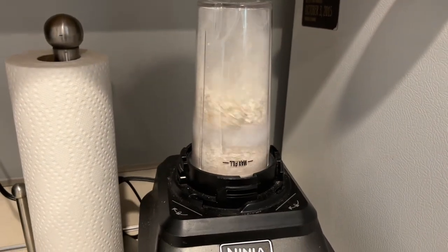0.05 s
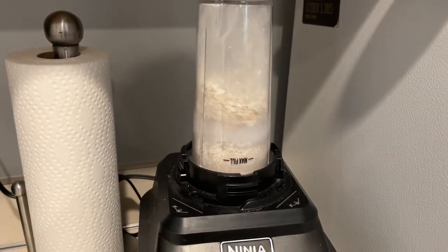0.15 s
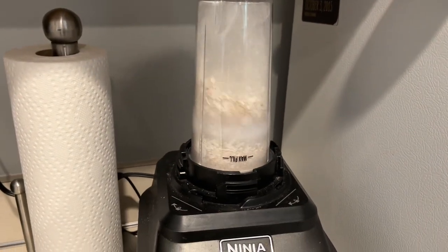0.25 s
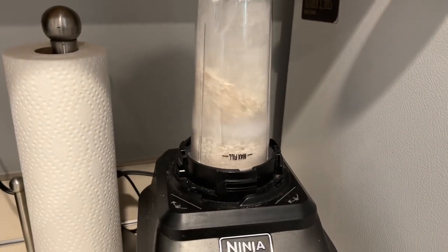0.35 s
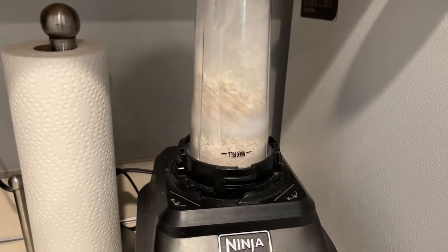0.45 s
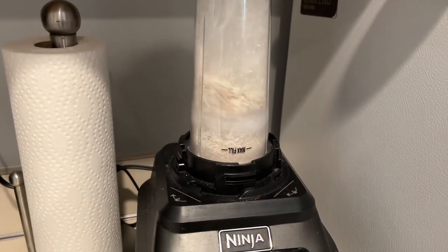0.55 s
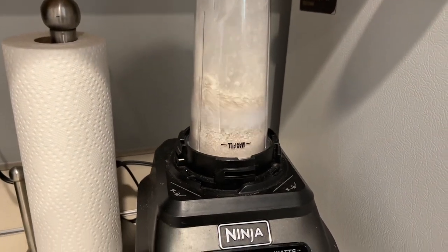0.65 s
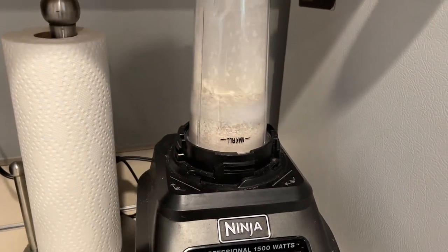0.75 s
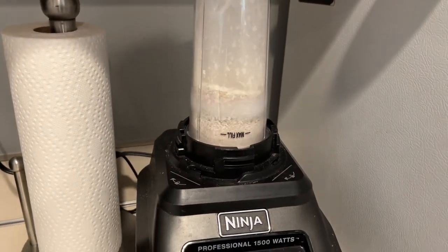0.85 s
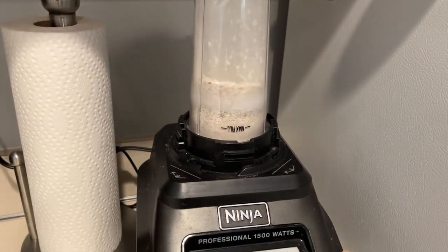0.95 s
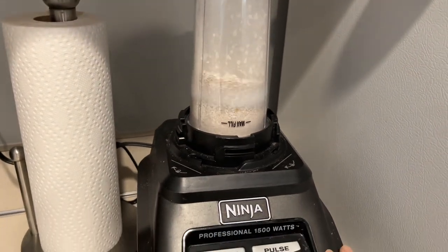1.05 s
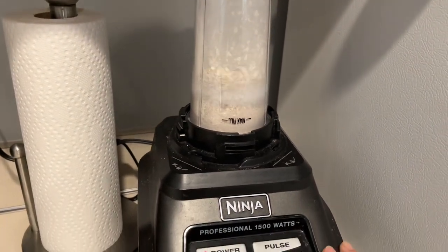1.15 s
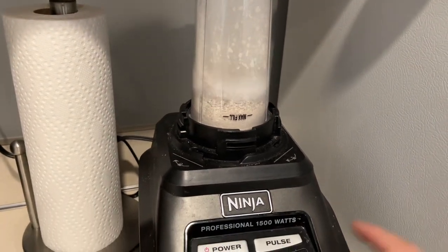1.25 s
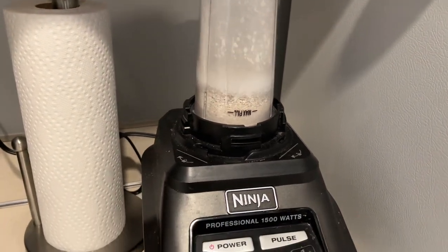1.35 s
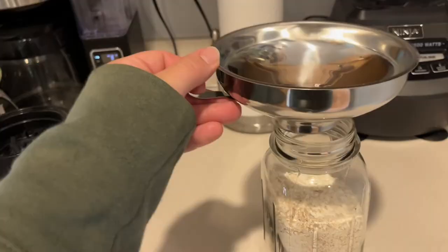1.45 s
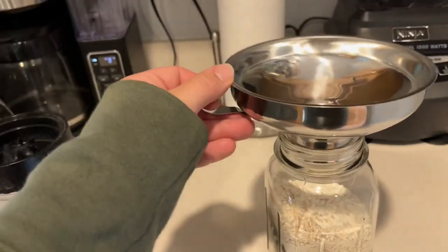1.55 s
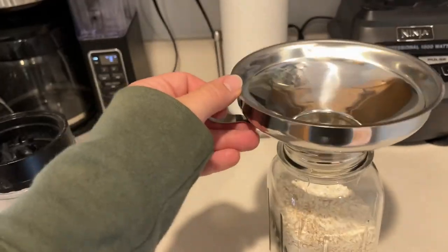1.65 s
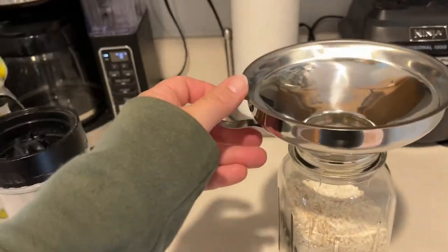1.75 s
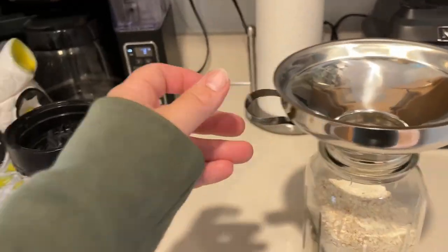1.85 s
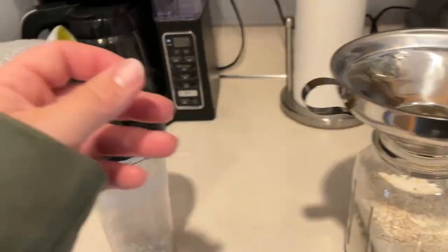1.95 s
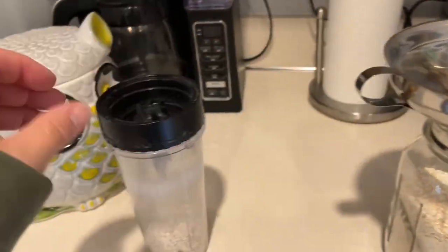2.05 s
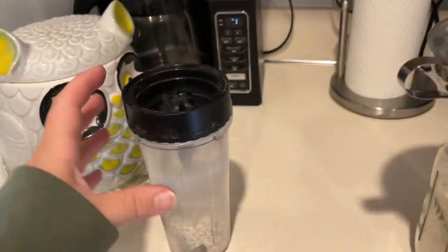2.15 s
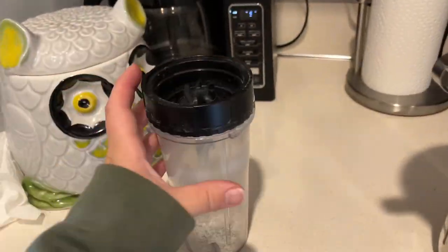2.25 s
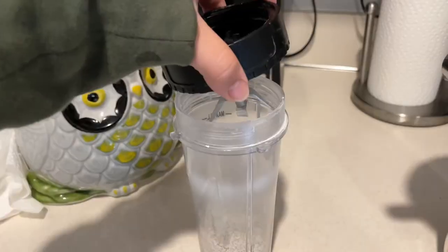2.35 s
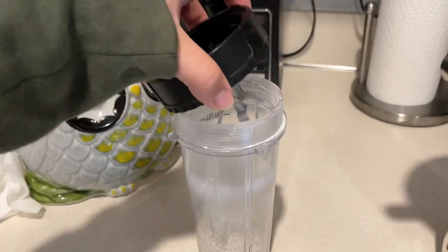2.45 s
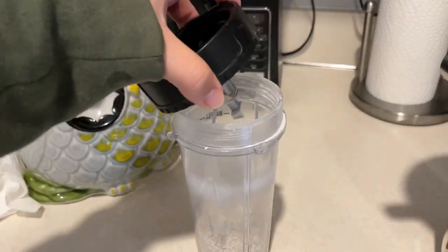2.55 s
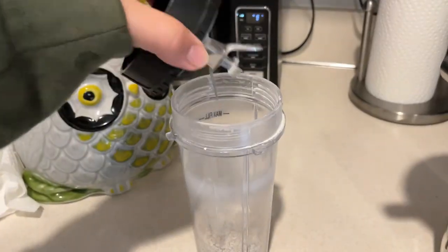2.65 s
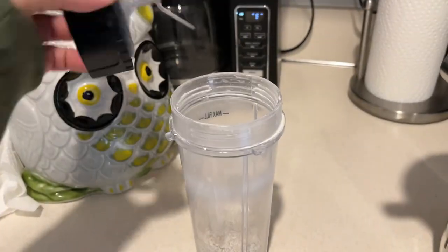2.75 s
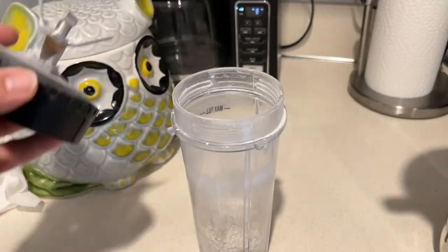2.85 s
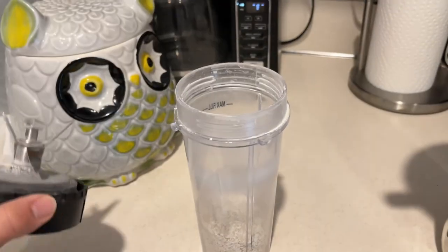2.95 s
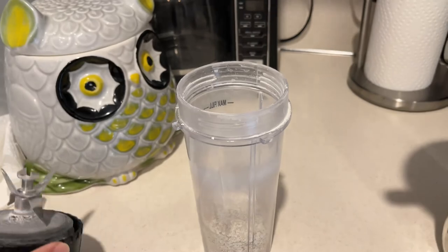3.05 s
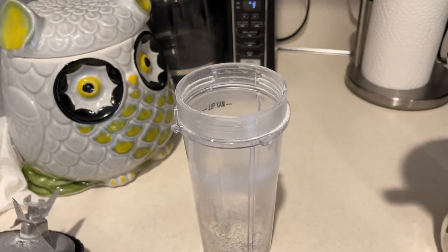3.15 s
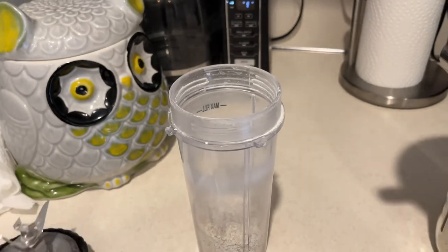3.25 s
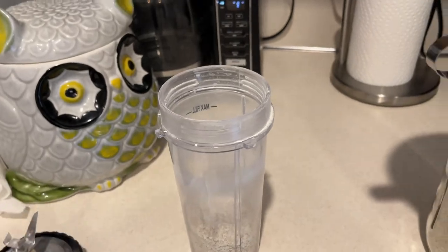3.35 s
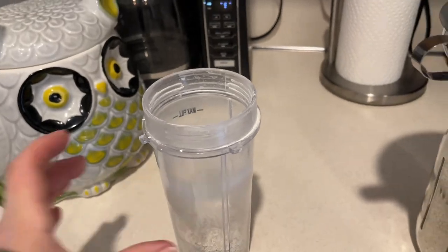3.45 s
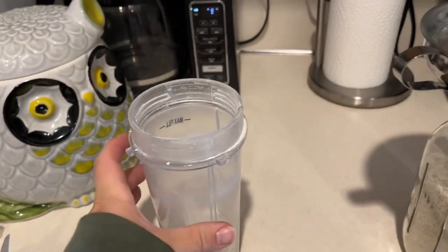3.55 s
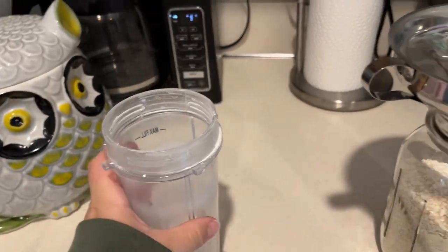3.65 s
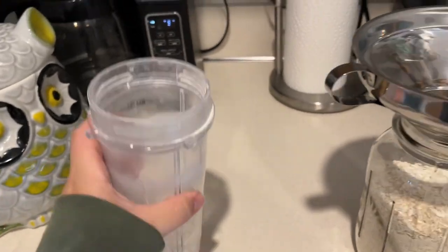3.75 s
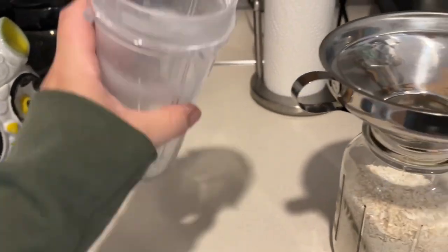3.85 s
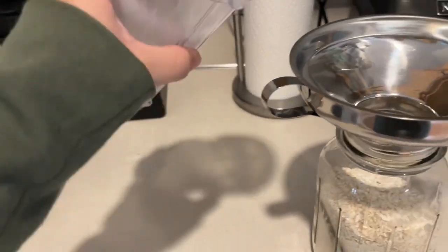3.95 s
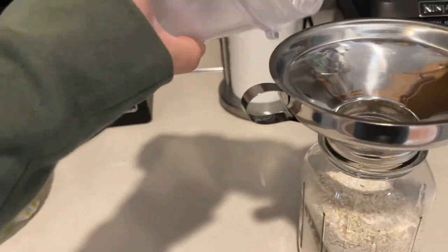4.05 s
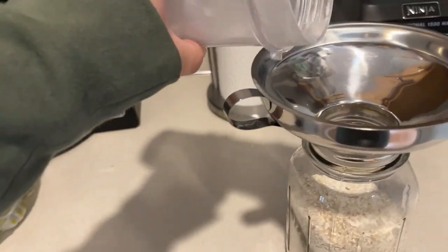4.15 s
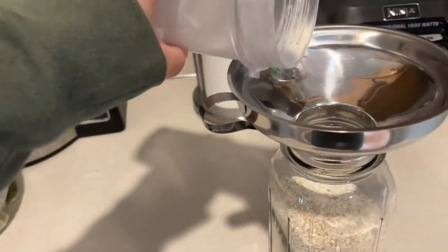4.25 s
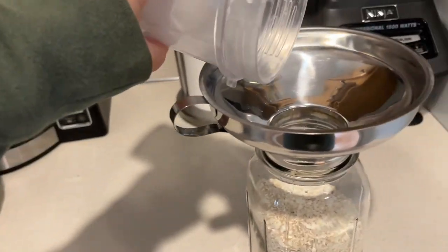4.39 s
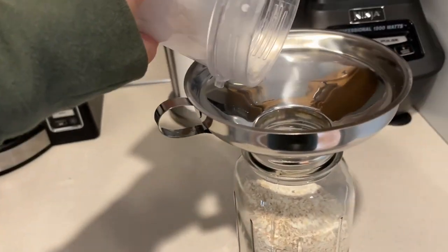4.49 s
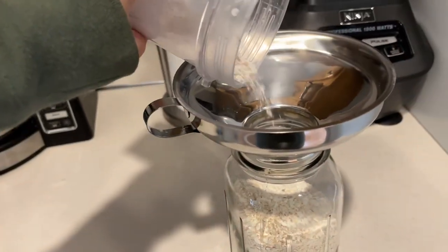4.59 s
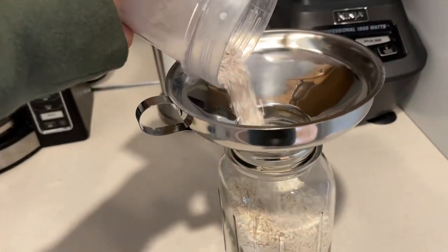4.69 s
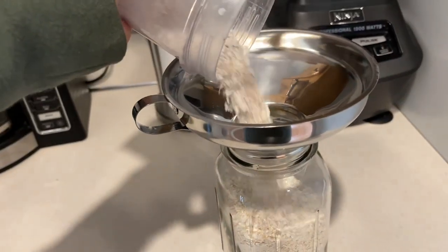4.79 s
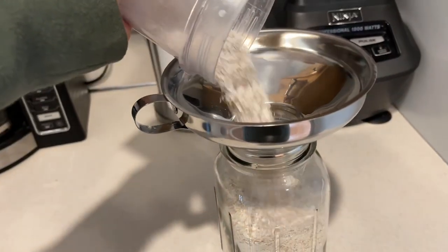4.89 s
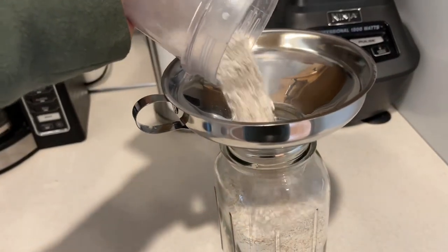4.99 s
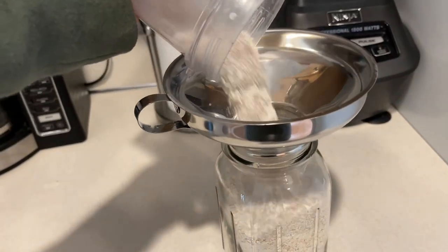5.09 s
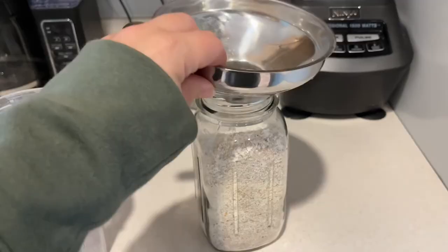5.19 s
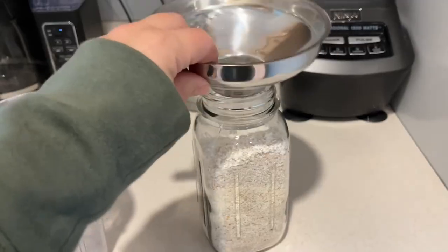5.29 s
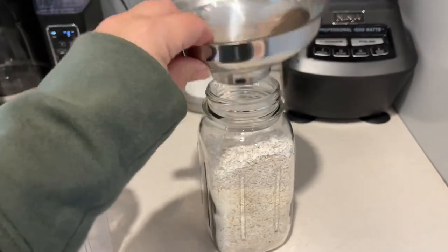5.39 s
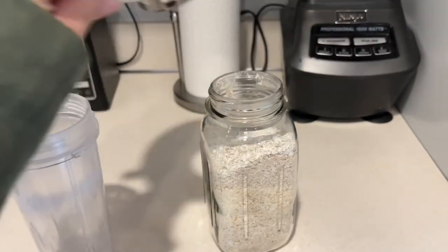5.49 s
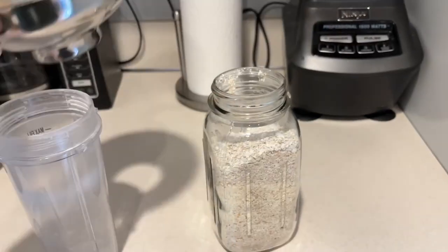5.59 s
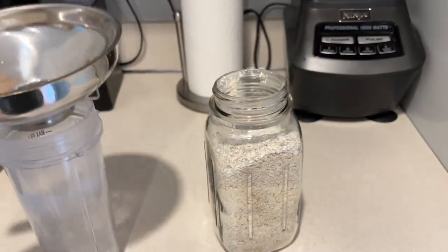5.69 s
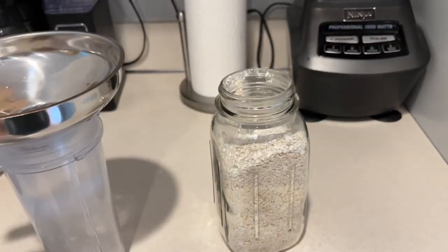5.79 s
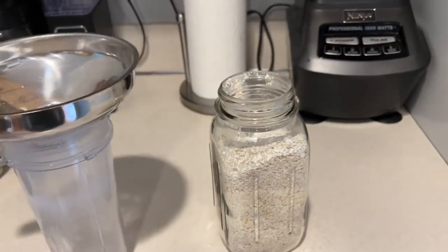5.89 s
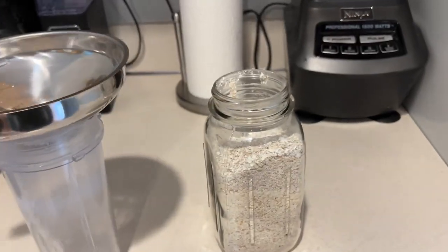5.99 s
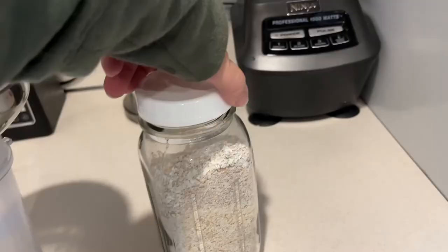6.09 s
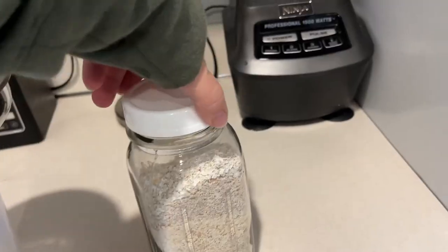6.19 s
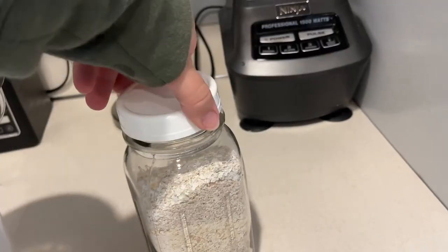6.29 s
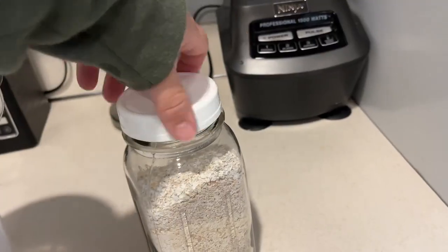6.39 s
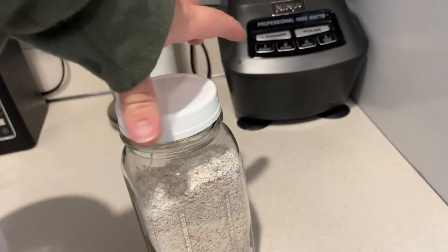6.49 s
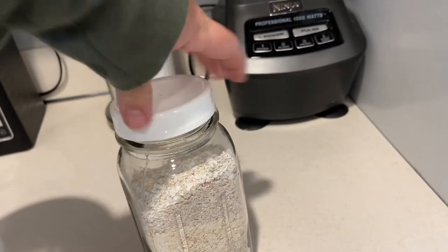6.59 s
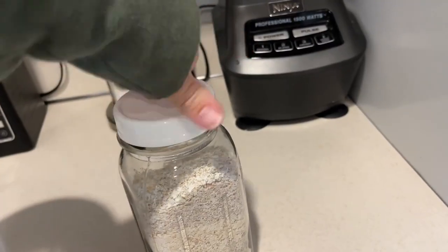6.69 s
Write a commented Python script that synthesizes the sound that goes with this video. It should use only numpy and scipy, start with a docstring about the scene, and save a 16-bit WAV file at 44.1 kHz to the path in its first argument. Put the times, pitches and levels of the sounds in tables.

```python
"""Eggshell powder in a kitchen

A blender grinds eggshells, with whining tones and pelting grit that both follow the shaft speed as it coasts
to a stop. In a humming kitchen a steel funnel is set on a glass jar, the blade base comes off the plastic cup
and is put down, the powder is poured, the funnel is dropped on the cup and a plastic lid is screwed on the jar.
Knocks are short noise bursts plus ringing tones; powder, rubbing and scraping are streams of tiny impacts.
"""
import sys
import numpy as np
from scipy import signal
from scipy.fft import rfft, irfft, next_fast_len
from scipy.io import wavfile
from scipy.ndimage import uniform_filter1d

SR = 44100
rng = np.random.default_rng(int(sys.argv[2]) if len(sys.argv) > 2 else 0)


def unload_wav(signal):
    """Save mono or channel-first audio to the path in sys.argv[1] as 16-bit WAV at rate SR, clipped to [-1, 1]."""
    wavfile.write(
        sys.argv[1],
        SR,
        np.round(np.clip(np.atleast_2d(signal).T, -1, 1) * 32767).astype(np.int16),
    )


N = 296793
TIME = np.arange(N) / SR

# Tones of the blender's whine.
# Each row: multiple of the shaft speed, level in dB before the housing, change while coasting in dB.
WHINE_TONES = [(1.995, 2, -0.5), (3.997, -9, 1), (5.98, -3.5, -11), (7.19, -11.5, 6), (8.05, -9.5, 3.5),
               (9.97, -8.5, -5.5), (11.96, -8.5, -3), (13.74, -20.5, -3), (16.04, -18.5, -4),
               (18.4, -17, -9), (27.5, -28, 15)]
# How strongly the motor housing passes each pitch. Each row: frequency in Hz, gain in dB.
HOUSING_RESPONSE = [(40, -18), (110, -3), (250, -7), (420, -1.5), (650, -2), (830, 2), (1150, 3),
                    (1480, 6.5), (1950, -7.5), (2650, -10), (3050, -28), (3240, 1), (3450, -1), (3880, 4.5),
                    (4300, 2), (6000, -4.5), (9000, -19.5)]

# Colours: how the strength of a sound is spread from bass to treble.
# Each row of these: frequency in Hz, relative level in dB per Hz.
# First the grit in the blender and the kitchen air.
GRIT_COLOUR = [(30, -5), (100, -4), (150, -6.5), (370, 3), (550, -2), (950, 5.5), (1200, 4), (1500, 11.5),
               (1800, 5), (2800, -2), (4100, 4.5), (5500, -2), (6700, 0.5), (9200, -7.5), (10200, -4),
               (12700, -6), (14000, -11), (16000, -13)]
KITCHEN_COLOUR = [(25, 1), (40, -9), (72, -9), (100, 4.5), (140, -9), (220, -4.5), (330, -6.5), (500, 0.5),
                  (900, -2.5), (1550, -5), (2000, -10.5), (2700, -19.5), (4700, -22.5), (6000, -28),
                  (16000, -31)]
# Knocks of funnel, cup, blade base and lid, before their own thud and crack are added. Same columns.
FUNNEL_KNOCK_COLOUR = [(80, -8), (120, -7), (170, -4), (330, -1.5), (600, -4.5), (850, 3), (1200, -4),
                       (1600, -16), (2100, -16.5), (2900, -5.5), (3700, -24.5), (5200, -16.5),
                       (7000, -24.5), (12000, -30), (16000, -33)]
CUP_KNOCK_COLOUR = [(80, -8), (110, 7), (170, 3), (256, -14), (400, -5.5), (700, -4.5), (1050, 6),
                    (1400, -3.5), (1800, -9), (2400, -17.5), (3300, -27), (5000, -29.5), (7500, -35),
                    (12000, -48), (16000, -64)]
BASE_KNOCK_COLOUR = [(41, -45), (70, -9), (268, -4.5), (385, -11.5), (579, -9.5), (815, -1.5), (977, 0),
                     (1120, -1.5), (1650, -7), (1930, -2), (3260, -20), (6590, -25), (9700, -32.5),
                     (10900, -46), (16000, -60)]
LID_KNOCK_COLOUR = [(60, -40), (110, -15), (240, -1.5), (550, 0.5), (1000, -2.5), (1500, 4.5), (2150, -1),
                    (2850, -25), (4100, -14.5), (5300, -23), (8000, -19.5), (11500, -28), (16000, -36)]
# Rubbing of the cup, sliding powder, and powder pattering into the jar. Same columns.
CUP_RUB_COLOUR = [(300, -2), (700, -2), (1000, 20), (1600, 5), (2700, -21), (3700, 6.5), (4300, -7),
                  (4800, 12), (5600, -16), (6700, -2.5), (9500, -23), (16000, -36)]
POWDER_COLOUR = [(500, -41), (2500, -11), (4500, -5), (8000, -6.5), (12500, -5.5), (16000, -15)]
JAR_PATTER_COLOUR = [(150, -27), (350, -8.5), (700, -7.5), (1100, 2), (1500, -9.5), (2500, -27),
                     (8000, -40)]
# The lid's edge scraping, and the lid's thread. Same columns.
LID_SCRAPE_COLOUR = [(500, 2), (1100, 4.5), (2000, -3), (2900, -15), (4100, 3), (5600, -13.5), (9000, -20),
                     (11700, -18), (13000, -26), (16000, -32)]
THREAD_COLOUR = [(150, -8), (550, 2.5), (1100, 3), (1500, 1), (2100, 6), (2800, -15.5), (4000, -8.5),
                 (5300, -19), (7000, -17), (9500, -25), (11500, -22), (16000, -39)]

# Steady tones of the appliance hum. Each row: frequency in Hz, level in dB.
HUM_TONES = [(54.6, -62.5), (93, -71), (99, -72.5), (118, -72.5), (287.8, -59.5), (602, -69.5),
             (699, -76.5), (803, -67.5), (926, -66.5), (1029, -75.5), (1204, -76.5)]

# Ringing tones (modes) of each object.
# Each row of these: frequency in Hz, level in dB, time to fade by 60 dB in seconds.
# The steel funnel by itself, ringing free.
FUNNEL_MODES = [(4113, 1, .52), (4103, -5, .5), (5416, -11, .16), (6149, -6, .66), (6616, -13, .2),
                (6880, -16, .2), (7337, -10, .12), (8350, -16, .48), (10502, -10, .32), (11776, -17, .26),
                (12330, -21, .24), (12920, -18, .2), (13235, -11, .2)]
# The glass jar together with the steel funnel. Same columns.
JAR_MODES = [(129, -2, 0.072), (315, -3.5, 0.095), (472.7, 1, 0.087), (576.6, 0.5, 0.13), (638, -5, 0.18),
             (807.6, 7, 0.076), (926, 2, 0.14), (1590, -9, 0.1), (1878, -3.5, .14), (2470, -8, 0.12),
             (2700, -7.5, 0.096), (3505, -44, 0.038)]
# The plastic cup, the blade base and the lid. Same columns.
CUP_MODES = [(249.4, 9, 0.075), (700, 15, 0.039), (763, -4, 0.16), (870, 5.5, .17), (1030, -8.5, 0.22),
             (1112, -0.5, 0.27), (1186, -33, .13), (1421, -11, 0.42), (1616, 2.5, 0.043),
             (2360, -6.5, 0.098)]
BASE_MODES = [(269.5, -3, 0.17), (880, 4, 0.15), (1154, 11, 0.083), (1230, 2.5, 0.1), (1547, -4.5, 0.22),
              (1910, -1, 0.12), (1990, -6, 0.12), (2290, -11, .11), (3680, -20, 0.13), (4280, -10, 0.074),
              (4940, -18, .1), (5286, -17, .1)]
LID_MODES = [(1360, -19, .08), (1760, -5, 0.074), (2120, 7, 0.11), (2610, -8, 0.064)]

# The funnel knocks on the jar.
# Each row: start in seconds, level in dB, thud in dB, crack in dB, steel ring in dB.
FUNNEL_BLOWS = [(1.5668, -21.5, -11, -7, -39), (1.596, -27.5, -6, -7, -46), (1.617, -37.5, -6, -1, -53),
                (1.635, -39.5, -6, -7, -47), (1.6653, -17.5, 6.5, 1, -26), (1.749, -34, -8, 8, -54),
                (5.235, -16.5, -2, 11.5, -35), (5.247, -22, -11, 3, -22.5), (5.288, -16, 7.5, 8, -26),
                (5.334, -21, -2, -15, -43), (5.339, -20.5, -3.5, -15.5, -63), (5.393, -27.5, -14, -11, -46)]
# Steel skids over the glass rim. Each row: start in seconds, level in dB.
FUNNEL_SKIDS = [(1.677, -28), (1.69, -26.5), (5.267, -31.5), (5.316, -34.5)]
# Knocks on the cup: the blade base comes off, later the funnel lands.
# Each row: start in seconds, level in dB, thud in dB, crack in dB.
CUP_BLOWS = [(2.321, -32, 2.5, 1.5), (2.465, -40, -3, 6), (2.503, -31.5, 7.5, 7.5),
             (2.528, -27.5, -12, -10), (2.56, -24, -2.5, 4), (2.614, -31, -4, -3), (3.71, -50.5, 2, 17),
             (5.7808, -19.5, -13, 2.5), (5.811, -31, -6, 8)]
# The blade base is set on the counter. Each row: start in seconds, level in dB, thud in dB, crack in dB.
BASE_BLOWS = [(3.23, -20, -0.5, 1), (3.245, -27, 2, 7), (3.255, -29.5, 1, -13), (3.305, -42, 0, -18),
              (3.362, -27.5, -3, 14.5)]
# The lid clicks on the jar. Each row: start in seconds, level in dB, thud in dB, crack in dB.
LID_BLOWS = [(6.352, -40, 7, 6.5), (6.4875, -37.5, 10, -2), (6.616, -37, 17, 2), (6.6335, -24.5, -30, -3),
             (6.671, -40, 18, 10)]

# Sliding movements. Each row of these: time of the peak in seconds, peak level in dB,
# rise in seconds, fall in seconds. First the hand rubbing the cup.
CUP_STROKES = [(1.87, -60, .2, 0.2), (2.3, -68, .14, .04), (2.68, -63.5, 0.31, .18),
               (3.69, -62, 0.16, 0.15), (3.86, -53.5, 0.077, .14)]
# Powder slides down the tilting cup. Same columns.
POWDER_SLIPS = [(3.96, -70, .05, .14), (4.1, -61.5, 0.018, .05), (4.932, -65, .02, 0.017)]
# The bulk of the powder lands in the jar. Same columns.
POWDER_HEAP = [(4.92, -51.5, 0.17, 0.11)]
# The lid's edge scrapes the glass. Same columns.
LID_SCRAPES = [(6.085, -46.5, 0.039, 0.062), (6.472, -46, 0.034, 0.044), (6.67, -50.5, 0.044, .12)]
# Turns of the lid on its thread. Same columns.
LID_TURNS = [(6.17, -50.5, .07, .18), (6.46, -48, 0.071, 0.074), (6.645, -44, .02, 0.16)]

# The level dips briefly. Each row: middle in seconds, length at full depth in seconds, depth in dB.
DIPS = [(2.359, 0.02, -31), (5.222, 0.0061, -8), (6.121, 0.0072, -32)]

RUN_HZ, POWER_OFF_S = 324.7, .515  # shaft speed under power; the moment it is switched off
START_LAG_HZ, SPIN_UP_S = 7, .08  # the last of the spin-up
DRAG_S, FRICTION_HZ_PER_S = .8, 201.5  # air drag and dry friction brake the coasting shaft
WHINE_DB, WHINE_POWER = -41.9, 0.44  # gain at full speed; amplitude goes as speed to this power
WHINE_KNEE_HZ, KNEE_WIDTH_HZ, WHINE_DROP_DB = 209, 12.6, -17.5  # below this speed the whine falls away
# grit: level at the start, at full speed; it is quieter as it slows and as it gets finer
GRIT_DB, GRIT_POWER, FINER_DB_PER_S = -48.5, 1.39, -4
KITCHEN_UP_S = 1.507  # the kitchen background comes up to full level here
HELD_FREEDOM, LIFTED_S = 0.28, 5.356  # share of its ring time the steel keeps on the jar; when it comes clear
SKID_RING_DB, SKID_TILT_DB, SKID_FREEDOM = -10, 8, 0.42  # ring of a skid, rise per octave, share of ring time
POUR_S, POUR_DB = 4.916, -63.5
POUR_RISE_S, POUR_HOLD_S, POUR_STOP_S = 0.51, 0.3, 0.12  # the stream builds as the cup tilts
ROCK_S, ROCK_GAP_S, ROCK_SHRINK = 5.873, .075, .7  # first tap, first gap, ratio from gap to gap
ROCK_DB, ROCK_LOSS_DB = -36.5, -4.8  # level of the first tap; change from tap to tap
KNOCK_LOW_HZ = 85  # the knocks are cut below this
ROOM_T60_S, ROOM_DB = 0.18, -10  # time for the tail to fade by 60 dB; its level
TOP_HZ = 16100

# Filters a third of an octave wide, for building knocks
BAND_HZ = 100 * 2 ** (np.arange(23) / 3)
BANDS = [signal.butter(2, [hz * .89, hz * 1.12], "band", fs=SR, output="sos") for hz in BAND_HZ]


def undb(db):
    """Turn decibels into a gain."""
    return 10 ** (np.asarray(db) / 20)


def unit(x):
    """Scale to an average (rms) level of 1."""
    return x / np.sqrt(np.mean(x ** 2))


def gain_at(hz, colour):
    """Read a colour's gain at the given frequencies."""
    points, db = np.transpose(colour)
    return undb(np.interp(np.log(hz + 1e-9), np.log(points), db))


def tint(x, colour):
    """Give a signal a colour, at rms 1."""
    size = next_fast_len(N)
    hz = np.arange(size // 2 + 1) * SR / size
    return unit(irfft(rfft(x, size) * gain_at(hz, colour), size)[:N])


def walk(rate):
    """Slow chance: random levels, `rate` of them a second, joined by slopes, spread 1."""
    hold = int(SR / rate)
    steps = np.repeat(rng.standard_normal(N // hold + 1), hold)
    return unit(uniform_filter1d(steps, hold)[:N])


def grains(per_s, spread_db=1):
    """Tiny impacts at random moments, a few larger than the rest."""
    size = undb(spread_db * np.minimum(rng.exponential(size=N), 2 * np.pi))
    hits = rng.random(N) < per_s / SR
    return hits * size * rng.standard_normal(N)


def swell(s, rise_s, fall_s, hold_s=0):
    """A rounded attack up to time s, a hold, an even decay; rise and fall each span 20 dB."""
    attack = (np.maximum(s - TIME, 0) / rise_s) ** 2
    release = np.maximum(TIME - s - hold_s, 0) / fall_s
    return undb(-20 * (attack + release))


def strokes(rows):
    """Gain of a series of sliding movements, each swelling and dying away."""
    return sum(undb(db) * swell(s, rise_s, fall_s) for s, db, rise_s, fall_s in rows)


def contact(colour, thud_db, crack_db, t60, bass_lag=0.039, thud_hz=450, crack_hz=3800):
    """The dense, fast-dying modes of a knock; lows last longer. Level 1 over five milliseconds."""
    t = np.arange(SR // 5) / SR
    thud = thud_db / (1 + (BAND_HZ / thud_hz) ** 2)
    crack = crack_db / (1 + (crack_hz / BAND_HZ) ** np.e)
    # a wider band holds more power
    gains = gain_at(BAND_HZ, colour) * undb(thud + crack) * np.sqrt(BAND_HZ)
    out = 0
    for hz, band, gain in zip(BAND_HZ, BANDS, gains):
        band_t60 = t60 * (1000 / hz) ** bass_lag
        fade = np.exp(-np.log(1000) * t / band_t60) * (1 - np.exp(-t / 0.00076))
        out = out + gain * unit(signal.sosfilt(band, fade * rng.standard_normal(len(t))))
    return out / np.sqrt(np.sum(out ** 2) / (SR / 200))


def ring(modes, freedom=1, scatter_db=2.5):
    """The clear modes of an object, weighted anew by every blow; touching it shortens them."""
    t = np.arange(SR * 2 // 3) / SR
    hz, db, t60 = np.transpose(modes)[:, :, None]
    size = undb(db + scatter_db * rng.standard_normal(hz.shape))
    fade = np.exp(-np.log(1000) * t / (t60 * freedom))
    waves = np.sin(2 * np.pi * (hz * t + rng.random(hz.shape))) * fade
    return np.sum(size * waves, axis=0) * (1 - np.exp(-t / 0.0018))


def add(out, s, sound):
    """Mix a sound in at time s."""
    start = int(s * SR)
    out[start:start + len(sound)] += sound[:N - start]


def struck(blows, colour, modes, t60, ring_db, chatter=0):
    """Each blow is a knock and a ring in proportion; with chatter, more crack than thud lasts longer."""
    out = np.zeros(N)
    for s, db, thud_db, crack_db, *_ in blows:
        knock_t60 = t60 * undb(chatter * (crack_db - thud_db))
        add(out, s, undb(db) * contact(colour, thud_db, crack_db, knock_t60))
        add(out, s, undb(db + ring_db) * ring(modes))
    return out


def shaft_speed():
    """The shaft settles at its running speed; with the power off, drag and friction bring it to rest."""
    driven = RUN_HZ - START_LAG_HZ * np.exp(-TIME / SPIN_UP_S)
    friction_hz = FRICTION_HZ_PER_S * DRAG_S
    coast_s = np.maximum(TIME - POWER_OFF_S, 0)
    braked = (driven + friction_hz) * np.exp(-coast_s / DRAG_S) - friction_hz
    return np.maximum(braked, 1)  # kept just above zero, as it is divided by later


def blender(flutter_db=1.3, coast_flutter_db=3.0, creep_hz=26):
    """Blades and fan whine on multiples of the shaft speed, grit pelts the cup; both fade with the speed."""
    steady = shaft_speed()
    share = steady / RUN_HZ
    coasting = np.clip(5 * (1 - share), 0, 1)  # reaches 1 when a fifth of the speed is gone
    # once the power is off, the dragging powder makes the shaft run unevenly
    speed = steady * (1 + (0.0013 + .006 * coasting) * walk(60.03))
    turn = 2 * np.pi * np.cumsum(speed) / SR

    whine = 0
    for k, db, coast_db in WHINE_TONES:
        flutter = (flutter_db + coast_flutter_db * coasting) * walk(34.75)
        # each tone swells as it slides through a resonance of the housing
        size = undb(db + coast_db * coasting + flutter) * gain_at(k * speed, HOUSING_RESPONSE)
        # a slow shaft no longer excites the high multiples
        size = size * np.exp(-k * (creep_hz / steady) ** 2)
        whine = whine + size * np.sin(k * turn + 0.075 * walk(120) + 2 * np.pi * rng.random())
    slow = 1 / (1 + np.exp((steady - WHINE_KNEE_HZ) / KNEE_WIDTH_HZ))
    whine_gain = undb(WHINE_DB + WHINE_DROP_DB * slow) * share ** WHINE_POWER

    # grit is flung in a puff at each blade pass, twice a turn
    puffs = 1 + 0.083 * np.sin(2 * turn)
    grit = grains(per_s=9000) * puffs * undb(0.46 * walk(25))
    finer_db = FINER_DB_PER_S * np.minimum(TIME, POWER_OFF_S)
    grit_gain = undb(GRIT_DB + finer_db) * share ** GRIT_POWER
    return whine * whine_gain + tint(grit, GRIT_COLOUR) * grit_gain


def kitchen(air_db=-57, early_db=-34):
    """Fan rush and the wavering hum of an appliance, far fainter while the blender is heard."""
    air = tint(rng.standard_normal(N), KITCHEN_COLOUR) * undb(air_db + 1.13 * walk(6.03))
    hum = 0
    for hz, db in HUM_TONES:
        size = np.sqrt(2) * undb(db + 1.57 * walk(6.3))
        hum = hum + size * np.sin(2 * np.pi * hz * TIME + np.sqrt(hz / 1200) * walk(9))
    kitchen_level_db = np.interp(TIME, [KITCHEN_UP_S - .03, KITCHEN_UP_S + 0.0044], [early_db, 0])
    return (air + hum) * undb(kitchen_level_db)


def funnel_on_jar():
    """Jar knocks and rim skids; the steel sings briefly while touching the glass, long once lifted clear."""
    out = struck(FUNNEL_BLOWS, FUNNEL_KNOCK_COLOUR, JAR_MODES, t60=.025, ring_db=-12.5, chatter=0.4)
    for s, *_, steel_db in FUNNEL_BLOWS:
        freedom = 1 if s > LIFTED_S else HELD_FREEDOM
        add(out, s, undb(steel_db) * ring(FUNNEL_MODES, freedom))
    # a skid bows the steel, which favours its higher modes
    lowest_hz = FUNNEL_MODES[0][0]
    bowed = [(hz, db + SKID_TILT_DB * np.log2(hz / lowest_hz), t60) for hz, db, t60 in FUNNEL_MODES]
    for s, db in FUNNEL_SKIDS:
        add(out, s, undb(db) * contact(FUNNEL_KNOCK_COLOUR, thud_db=-11, crack_db=22, t60=.1))
        add(out, s, undb(db + SKID_RING_DB) * ring(bowed, SKID_FREEDOM))
    return out


def cup_rubbing():
    """The hand rubs the cup: a dense stream of tiny impacts that swells with each stroke."""
    rub = tint(grains(per_s=4700), CUP_RUB_COLOUR)
    return rub * strokes(CUP_STROKES) * undb(1.5 * walk(29.93))


def knocks_on_cup(blows):
    """Blows make the plastic cup knock and ring for a short time."""
    return struck(blows, CUP_KNOCK_COLOUR, CUP_MODES, t60=0.022, ring_db=-14.5, chatter=0.41)


def base_on_counter():
    """The blade base knocks on the counter and its own modes ring."""
    return struck(BASE_BLOWS, BASE_KNOCK_COLOUR, BASE_MODES, t60=0.021, ring_db=-15)


def powder(patter_db=-2):
    """Powder slides down the cup and trickles over steel; its grains patter into the jar."""
    flow = undb(POUR_DB) * swell(POUR_S, POUR_RISE_S, POUR_STOP_S, POUR_HOLD_S)
    slide = tint(grains(per_s=5300, spread_db=1.5), POWDER_COLOUR)
    slide = slide * (flow + strokes(POWDER_SLIPS)) * undb(1.0 * walk(18))
    landing_gain = np.hypot(undb(patter_db) * flow, strokes(POWDER_HEAP))
    landing = tint(grains(per_s=1700), JAR_PATTER_COLOUR) * landing_gain
    return slide + landing


def rocking(count=5, thud_db=-1, crack_db=-6):
    """List the taps of the funnel settling on the cup, ever quicker and weaker."""
    taps = []
    s, gap_s = ROCK_S, ROCK_GAP_S
    for k in range(count):
        taps.append((s, ROCK_DB + ROCK_LOSS_DB * k, thud_db, crack_db))
        s, gap_s = s + gap_s, gap_s * ROCK_SHRINK
    return taps


def lid_scraping():
    """The lid's edge scrapes the glass in short strokes of tiny impacts."""
    return tint(grains(per_s=4500, spread_db=2.0), LID_SCRAPE_COLOUR) * strokes(LID_SCRAPES)


def lid_thread():
    """The thread sticks and slips as the lid turns, so its scrape comes in short bursts."""
    return tint(grains(per_s=1800), THREAD_COLOUR) * strokes(LID_TURNS) * undb(3.0 * walk(80))


def lid_clicks():
    """The plastic lid clicks on the jar and its modes ring briefly."""
    return struck(LID_BLOWS, LID_KNOCK_COLOUR, LID_MODES, t60=.019, ring_db=-18)


def room(x, damp_hz=7000):
    """Counter, wall and cupboards return a short, slightly duller tail."""
    t = np.arange(SR // 2) / SR
    onset = np.clip(t / 0.0024 - 1, 0, 1)
    tail = rng.standard_normal(len(t)) * np.exp(-np.log(1000) * t / ROOM_T60_S) * onset
    tail = tail / np.sqrt(np.sum(tail ** 2))
    tail = signal.sosfilt(signal.butter(1, damp_hz, fs=SR, output="sos"), tail)
    return x + undb(ROOM_DB) * signal.fftconvolve(x, tail)[:N]


def scene():
    """Blender first, then the handling of funnel, cup, blade base and lid."""
    motor = blender()
    knocks = funnel_on_jar() + knocks_on_cup(CUP_BLOWS + rocking()) + base_on_counter() + lid_clicks()
    knocks = signal.sosfilt(signal.butter(4, KNOCK_LOW_HZ, "high", fs=SR, output="sos"), knocks)
    sliding = cup_rubbing() + powder() + lid_scraping() + lid_thread()
    return (motor + room(knocks + sliding) + kitchen())[None]


def record(dry, fade_s=0.022):
    """The level dips briefly three times; the top is cut steeply."""
    dip_db = 0
    for s, length, db in DIPS:
        outside_s = abs(TIME - s) - length / 2
        dip_db = dip_db + db * np.clip(1 - outside_s / fade_s, 0, 1) ** 2
    return signal.sosfilt(signal.ellip(10, .1, 80, TOP_HZ, fs=SR, output="sos"), dry * undb(dip_db))


dry = scene()
out = record(dry)
unload_wav(out)
```